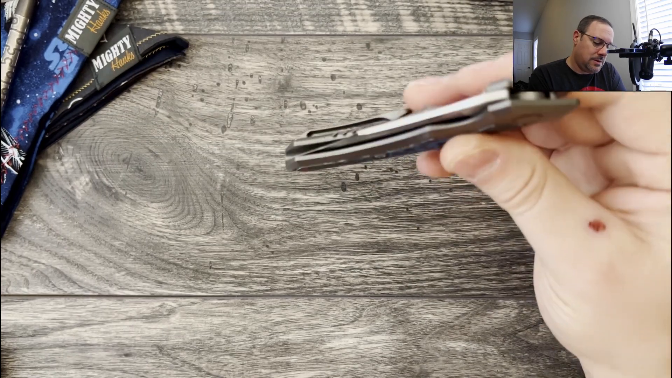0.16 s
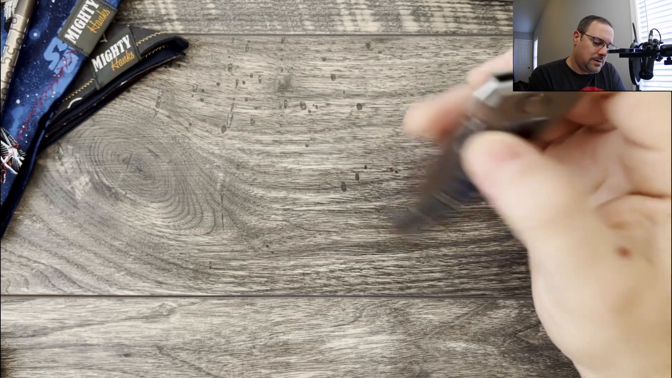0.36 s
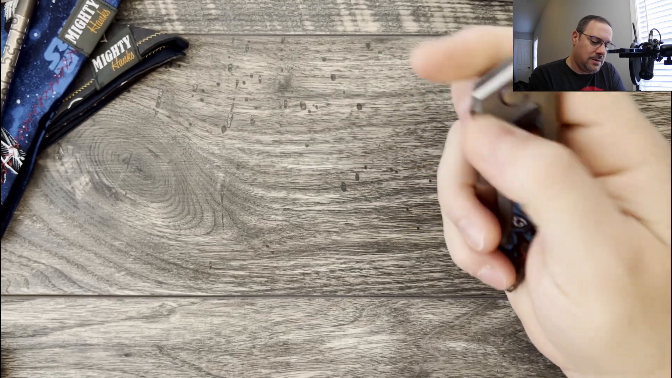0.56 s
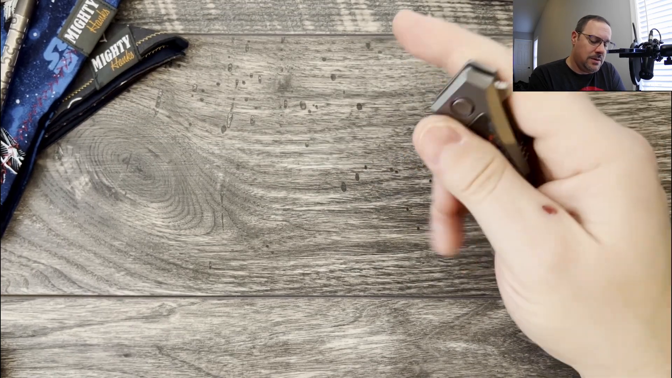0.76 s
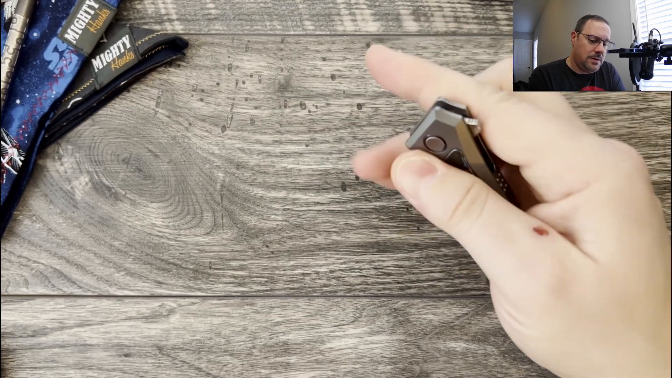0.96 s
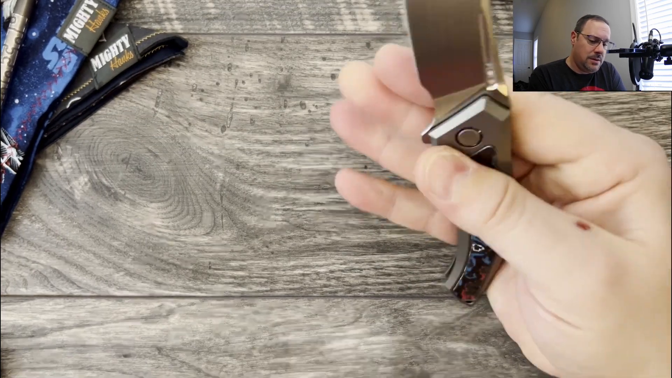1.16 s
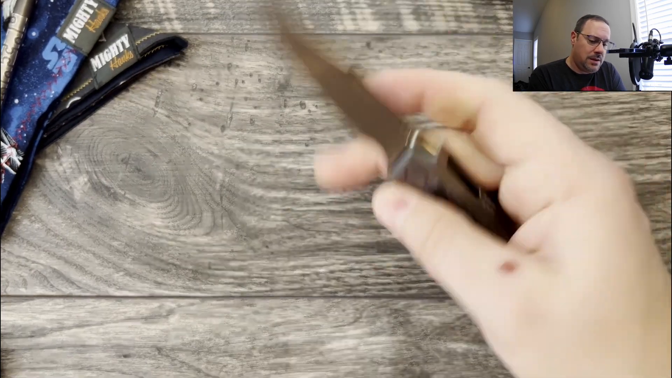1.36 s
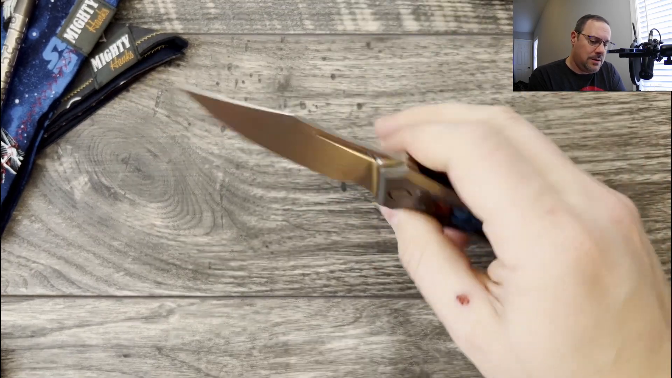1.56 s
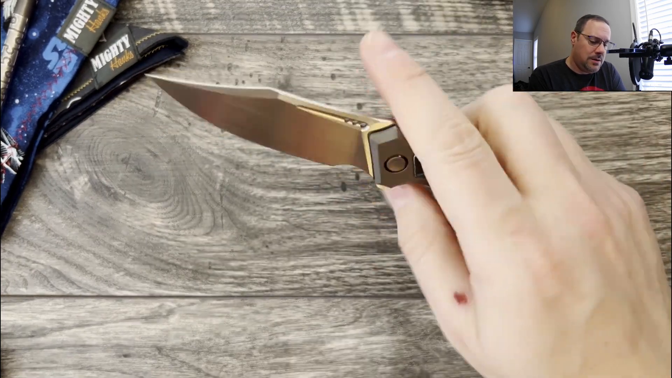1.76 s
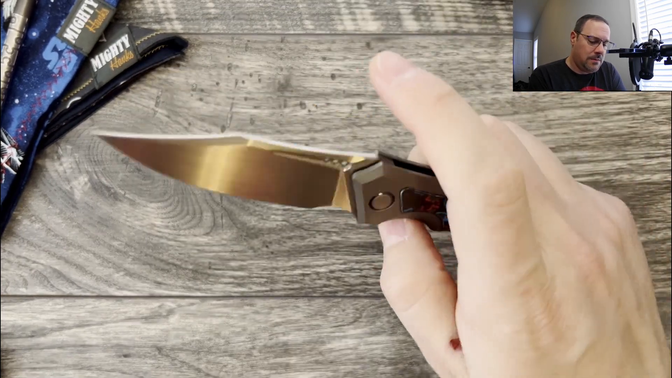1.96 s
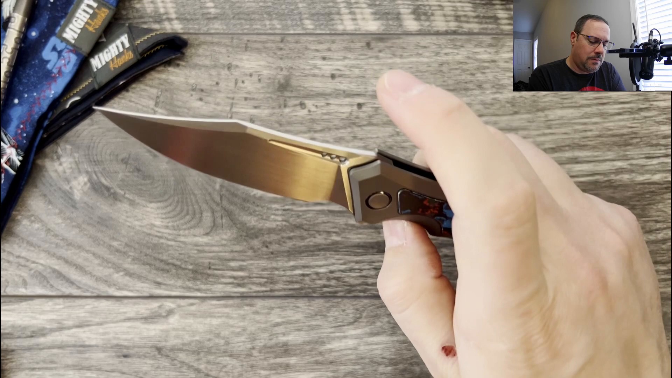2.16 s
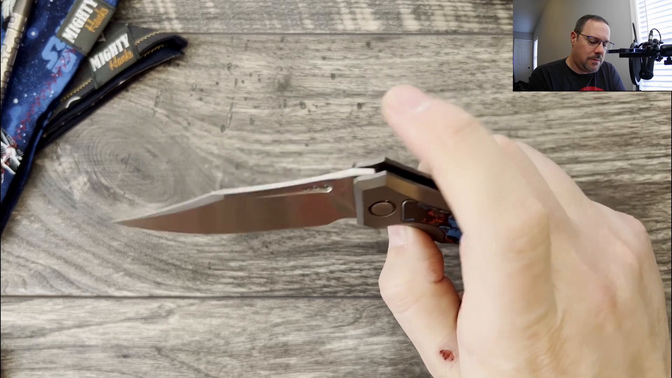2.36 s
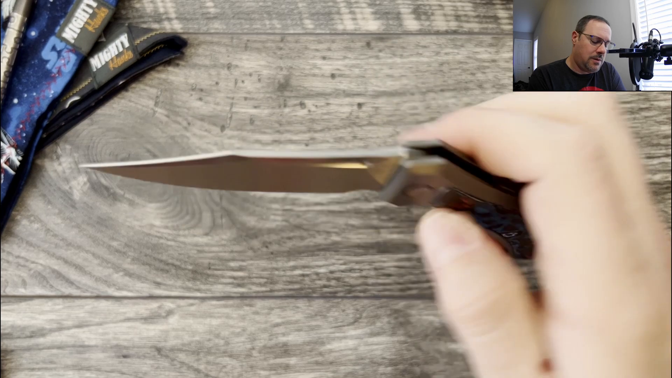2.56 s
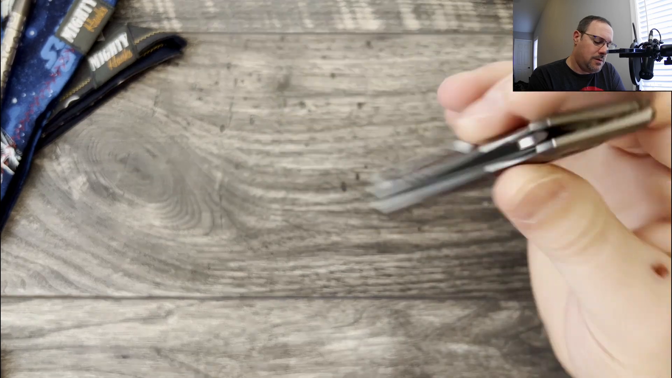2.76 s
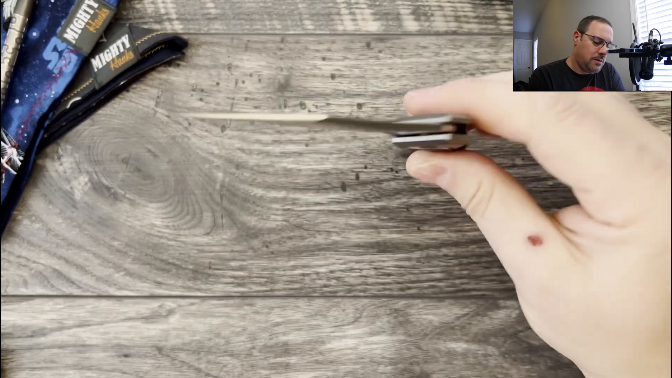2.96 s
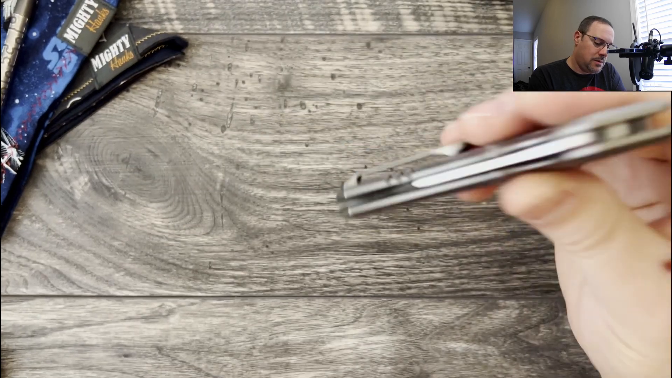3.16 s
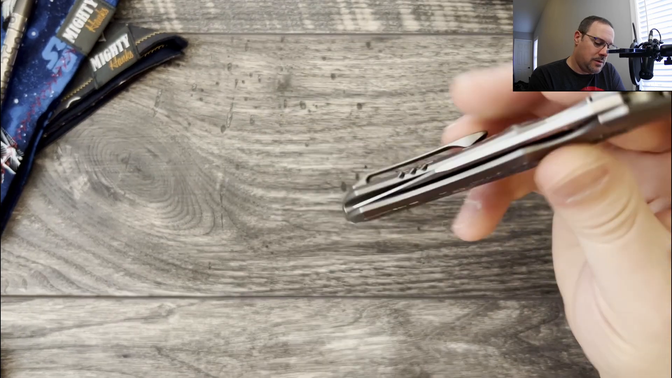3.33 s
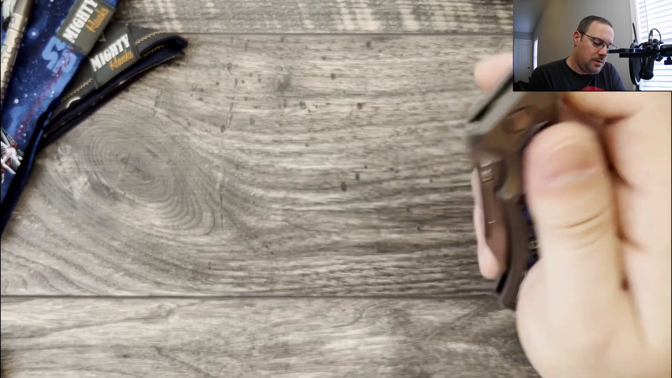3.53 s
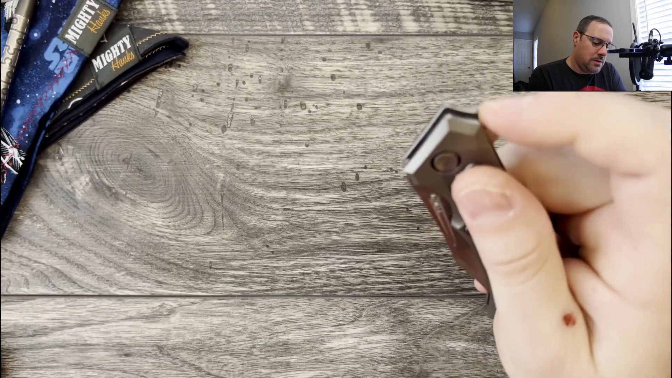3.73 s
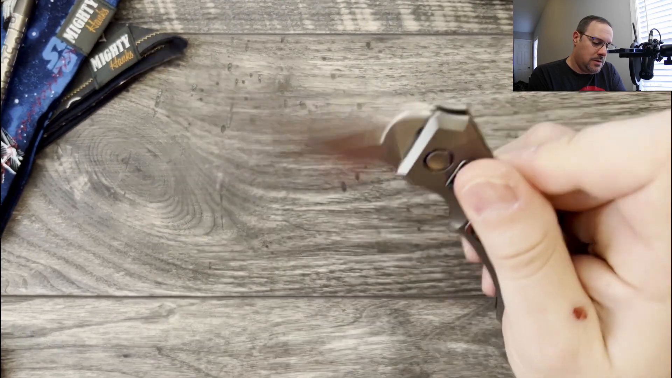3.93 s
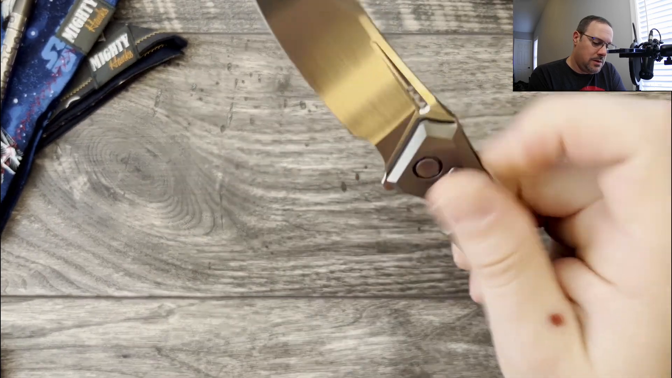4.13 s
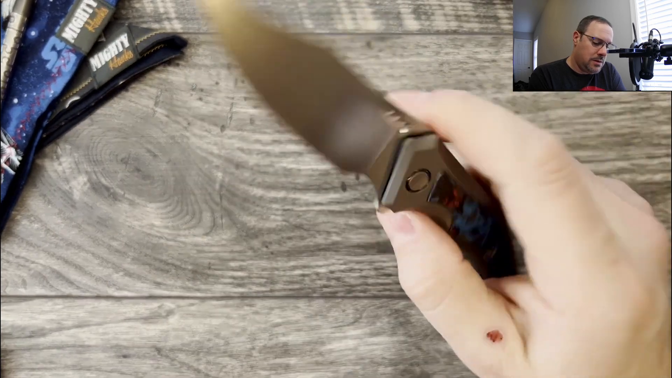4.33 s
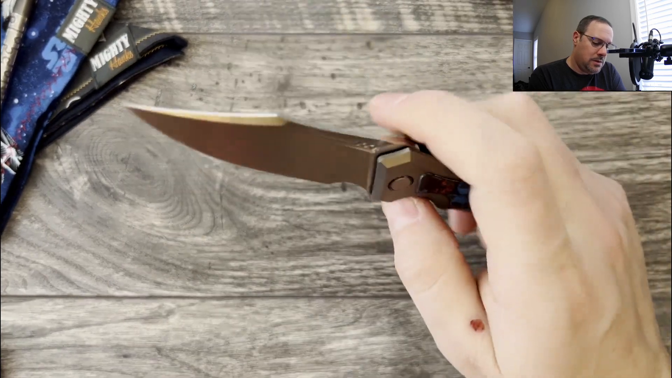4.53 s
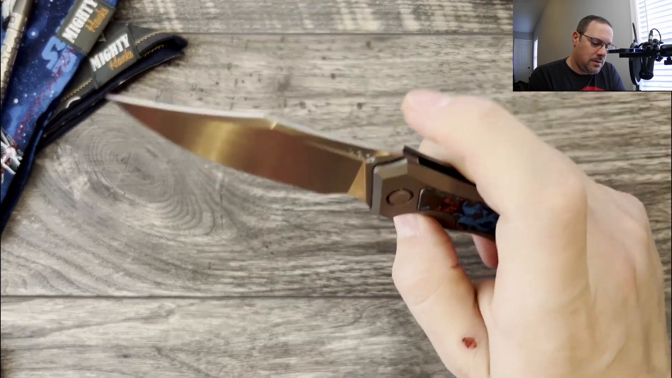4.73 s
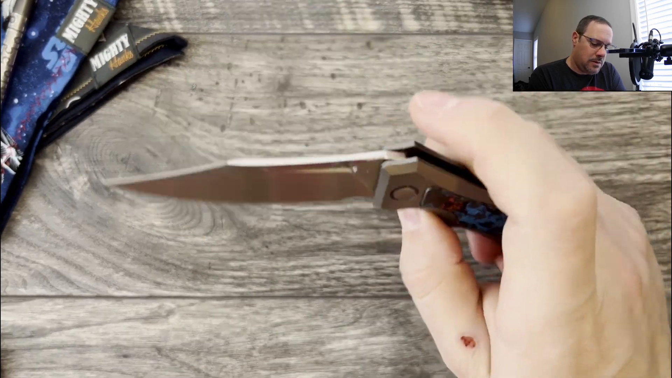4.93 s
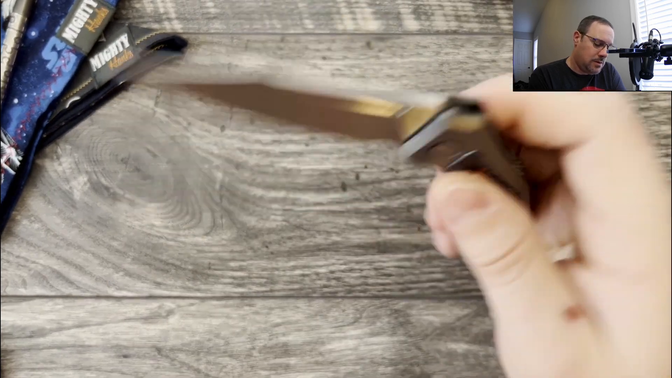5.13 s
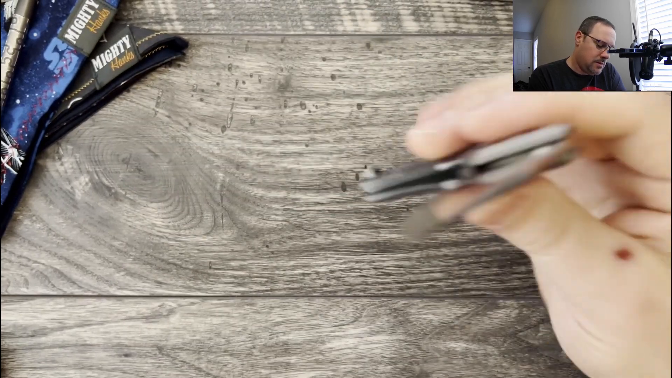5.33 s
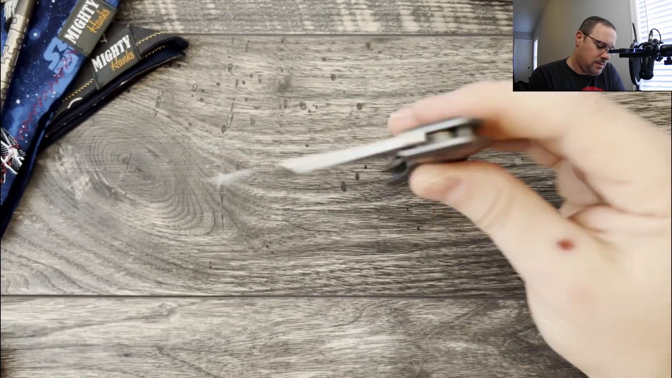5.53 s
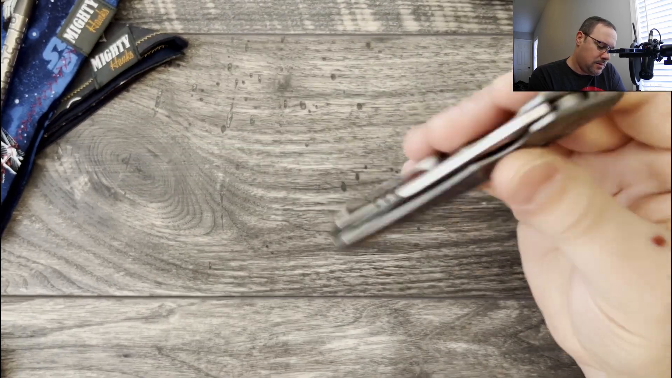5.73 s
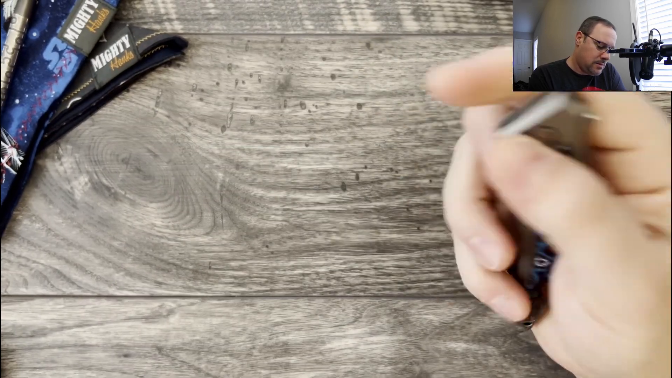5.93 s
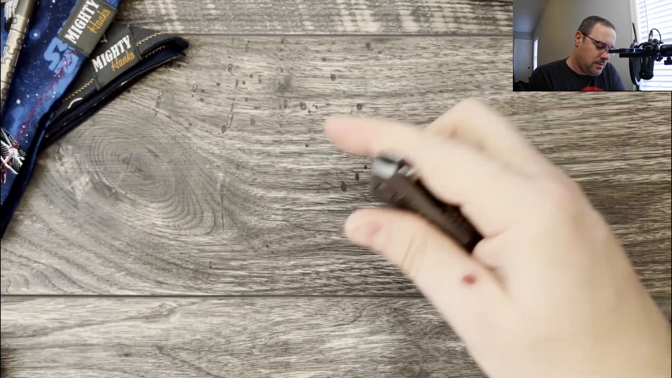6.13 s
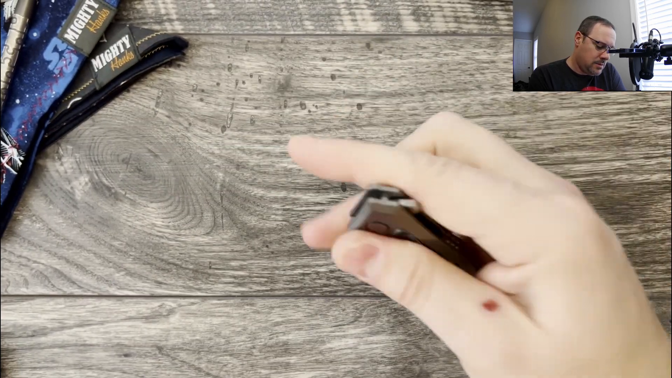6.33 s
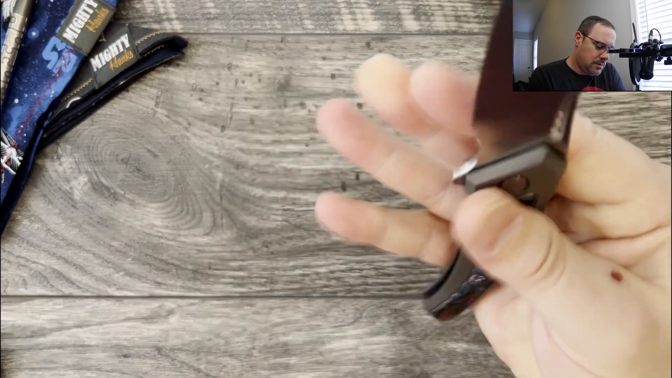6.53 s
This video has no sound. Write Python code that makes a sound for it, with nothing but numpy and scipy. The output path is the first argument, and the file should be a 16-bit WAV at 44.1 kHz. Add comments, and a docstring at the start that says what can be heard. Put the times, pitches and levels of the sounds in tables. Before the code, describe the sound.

Close, crisp knife action: blade drops shut with a rattly clack, then flicks open with a hard metallic snap, repeated in a small humming room.

```python
"""Small live room, stereo microphone close over a table: a metal folding knife is shut and flicked open three times.
A motor's low hum, a thin whine and the coloured noise of a fan run throughout, as steady tones and filtered noise.
First the blade drops shut with a clack and a rebound: short noise chatter rung through the handle's resonances.
Fingers then rub the handle as grainy hiss; a pivot swish leads to the lock bar's bright snap and the blade's hard clack.
The open blade rings on over a soft jolt of the hand; lock ticks fall in between, and the room answers the contacts."""
import sys
import numpy as np
from scipy import signal
from scipy.fft import rfft, irfft, next_fast_len
from scipy.io import wavfile
from scipy.ndimage import uniform_filter1d

SR = 44100
rng = np.random.default_rng(int(sys.argv[2]) if len(sys.argv) > 2 else 0)


def file_out(sig):
    """Save sig as 16-bit WAV at sys.argv[1]."""
    # one column per channel
    cols = np.atleast_2d(sig).T
    # limit, then scale
    lim = np.clip(cols, -1, 1)
    pcm = np.round(lim * 32767).astype(np.int16)
    wavfile.write(sys.argv[1], SR, pcm)


N = 295071
TIME = np.arange(N) / SR


def from_db(db):
    """Decibels to gain."""
    return 10 ** (np.asarray(db) / 20)


def at_hz(points, hz, axis=1):
    """Read one column of a table on a log-frequency axis."""
    table = np.array(points)
    return np.interp(np.log(hz + 1), np.log(table[:, 0]), table[:, axis])


def bins(size):
    """Frequencies of a real spectrum."""
    return np.arange(size // 2 + 1) * SR / size


def rms_one(x):
    """Scale to unit power."""
    return x / np.sqrt(np.mean(x ** 2) + 1e-20)


def add(out, s, sound):
    """Mix a sound in at time s."""
    start = max(0, round(s * SR))
    out[:, start:start + sound.shape[-1]] += sound[..., :N - start]


def colour(x, gain):
    """Causal (minimum-phase) filter with the given gain per bin."""
    size = x.shape[-1]
    cepstrum = irfft(np.log(gain + 1e-9), size)
    # fold the cepstrum onto positive time
    cepstrum[1:size // 2] *= 2
    cepstrum[size // 2 + 1:] = 0
    return irfft(rfft(x) * np.exp(rfft(cepstrum)), size)


def spread(pair, width):
    """Two unrelated signals become mid and side of a stereo pair."""
    mid = pair[0]
    side = colour(pair[1], from_db(at_hz(width, bins(pair.shape[-1]))))
    return np.array([mid + side, mid - side])


def resonant(modes, floor_gain, hz):
    """Gain per frequency of some resonances standing on a broad floor."""
    peaks = sum(from_db(db) ** 2 / (1 + 2 * ((hz - centre) / width) ** 2) ** 2
                for centre, width, db in modes)
    return np.sqrt(floor_gain ** 2 + peaks)


def noise(spectrum, width, modes=()):
    """Steady stereo noise of a given colour, rms 1."""
    size = 2 * next_fast_len(N // 2 + 1)
    hz = bins(size)
    white = spread(rng.standard_normal((2, size)), width)
    gain = resonant(modes, from_db(at_hz(spectrum, hz)), hz)
    return rms_one(colour(white, gain)[:, :N])


def drift(per_s):
    """A slow random wander with rms 1, aiming at per_s new values a second."""
    knots = rng.standard_normal(1000)
    return rms_one(np.interp(TIME * per_s, np.arange(len(knots)), knots))


# Thin electrical whine. Each row: pitch in Hz, level in dB.
WHINE = [(3130, -84), (6260, -102)]
HUM_HZ, HUM_LEVEL_DB = 59.3, -52.5
HUM_WAVER_DB, HUM_WAVER_PER_S = 1.5, 12   # size and pace of the hum's random swell


def hum(waver_rad):
    """A motor's low hum, unsteady in strength and phase, and a thin whine."""
    phase = 2 * np.pi * HUM_HZ * TIME + waver_rad * drift(HUM_WAVER_PER_S / 2)
    low = from_db(HUM_LEVEL_DB + HUM_WAVER_DB * drift(HUM_WAVER_PER_S)) * np.sin(phase)
    whine = sum(from_db(db) * np.sin(2 * np.pi * hz * TIME) for hz, db in WHINE)
    return np.sqrt(2) * (low + whine)   # levels are rms


# Colour of the fan noise. Each row: frequency in Hz, relative density in dB per Hz.
FAN = [(20, -20), (45, 1.5), (80, 6), (120, -1.5), (200, -5), (450, -8), (900, -8), (1300, -15),
       (2300, -15.5), (3250, -20.5), (5000, -37), (7450, -37), (8500, -44.5), (15500, -53.5), (16200, -70)]
# Fan's side against mid at the microphone. Each row: frequency in Hz, side level in dB.
FAN_WIDTH = [(60, -24.5), (130, -17), (290, -8.5), (640, -2), (1400, -4.5), (3000, -11), (7000, -2.5),
             (15000, -0.5)]
# Resonances in the fan noise. Each row: centre in Hz, width in Hz, level in dB.
FAN_MODES = [(257, 18, -6.5), (389, 12, -0.5), (545, 26, -3), (600, 15, -4.5), (645, 16, -5), (833, 16, -2),
             (868.7, 14, -4)]
FAN_DB = -58


def fan():
    """Steady broadband air noise with a few narrow resonances, filling the room."""
    return from_db(FAN_DB) * noise(FAN, FAN_WIDTH, FAN_MODES)


# Side against mid for the knife at the microphone. Each row: frequency in Hz, side level in dB.
WIDTH = [(100, -20), (400, -4.5), (700, -2.5), (1300, -17.5), (2400, -19), (4400, -9.5), (7000, -3),
         (15000, 2)]
# Colour of the rubbing hiss. Each row: frequency in Hz, level in dB.
SKIN = [(300, -21), (2000, -5), (4500, -2.5), (7000, 0), (9000, -4), (11000, -3.5), (13000, -10),
        (15300, -6), (16200, -25.5)]


def friction(modes, grain_db, grain_size):
    """Hiss that catches and slips every few milliseconds (grain_size in samples), rms 1."""
    grain = rms_one(uniform_filter1d(rng.standard_normal(N), size=grain_size))
    return rms_one(noise(SKIN, WIDTH, modes) * from_db(grain_db * grain))


# The blade swinging on its pivot. Each row: time of full speed in seconds, level in dB, run-up in seconds.
SWINGS = [(.02, -62.5, .1), (1.108, -46, .08), (3.924, -46, .037), (6.505, -46.5, 0.08),
          (3.098, -65.5, .125), (5.59, -63, 0.15)]
# Resonances of the turning pivot. Each row: centre in Hz, width in Hz, level in dB.
PIVOT = [(3950, 400, -2.5), (6300, 500, 0.5), (7800, 400, 2), (10900, 600, 5), (15100, 700, 0)]
SWING_RANGE_DB, SWING_STOP_S = 29.5, 0.09   # rise over the run-up; time to fall back as far


def pivot():
    """The pivot swishes louder as the blade gathers speed, and fades as it stops."""
    level = 0
    for s, db, run_up in SWINGS:
        distance = np.maximum((s - TIME) / run_up, (TIME - s) / SWING_STOP_S)
        level = level + from_db(db - SWING_RANGE_DB * distance)
    return level * friction(PIVOT, grain_db=2.6, grain_size=160)


def chatter(t60, rise_s, size, treble_hz=11000, treble_life=0.79):
    """Metal on metal: two unrelated dying bursts of micro-contacts, even in colour; their top dies first."""
    t, hz = np.arange(size) / SR, bins(size)
    white = rng.standard_normal((2, size))
    treble = irfft(rfft(white) / (1 + (treble_hz / (hz + 1)) ** 6), size)
    body = (white - treble) * from_db(-60 * t / t60)
    top = treble * from_db(-60 * t / (t60 * treble_life))
    burst = (body + top) * (1 - np.exp(-t / rise_s))
    # even out the colour
    power = uniform_filter1d(np.abs(rfft(burst)) ** 2, size=55, axis=-1)
    return np.array([colour(b, (p + 1e-12) ** -.5) for b, p in zip(burst, power)])


def strikes(events, modes, crack, rise_s, crack_db, room_crack_db, favour_db=3.0, size=4096):
    """Each contact chatters into the resonances of the struck part; its level is the rms of a 4 ms click
    of equal energy. Returns the sound aimed at the microphone and the broader one thrown into the room."""
    direct, thrown, hz = np.zeros((2, N)), np.zeros((2, N)), bins(size)
    octaves = np.log2(np.clip(hz, 1500, None) / 6000)
    for s, db, t60, tilt_db, favoured_hz, room_db in events:
        # grip and contact point tilt the colour and leave one resonance freer than the rest
        favour = favour_db / (1 + ((hz - favoured_hz) / 300) ** 2)
        grip = from_db(tilt_db * octaves + favour)
        burst = spread(chatter(t60, rise_s, size), WIDTH)
        for out, gain_db, floor_db in ((direct, 0, crack_db), (thrown, room_db, room_crack_db)):
            floor = from_db(at_hz(crack, hz) + floor_db)
            click = rms_one(colour(burst, resonant(modes, floor, hz) * grip))
            add(out, s, from_db(db + gain_db) * click * np.sqrt(.004 * SR / size))
    return np.array([direct, thrown])


# Blade dropping into the handle, then its rebound. Each row: start in seconds, level in dB, t60 in seconds,
# treble tilt in dB per octave, favoured frequency in Hz, send to the room in dB.
CLOSINGS = [(.0326, -15.8, .024, -.3, 5150, -.7), (.0465, -23, .048, -1, 7000, -1.5),
            (3.1166, -16, .032, -.3, 7200, -.3), (3.1322, -22.5, 0.045, -2, 7500, -1),
            (5.6034, -16.5, 0.028, 0.04, 10900, -1.5), (5.6150, -24, 0.044, -0.5, 4080, -1)]
# Resonances of the handle. Each row: centre in Hz, width in Hz, level in dB.
HANDLE = [(600, 260, -4.5), (980, 280, -2), (1520, 200, -10), (1984, 150, -5), (2870, 260, 2.5),
          (3935, 220, 7), (4440, 300, 4), (5150, 380, 4.5), (6250, 270, 6), (7060, 120, 14),
          (7750, 380, 6.5), (8800, 200, 6), (9800, 300, 1.5), (10850, 200, 8), (13640, 260, 5),
          (14980, 290, 10.5)]
# Broad crack under the handle's resonances. Each row: frequency in Hz, level in dB before the crack offsets.
CLOSE_CRACK = [(80, -22.5), (300, -14.5), (1000, -17.5), (2300, -17.5), (3500, -5), (8000, -8.5),
               (10500, -8), (12200, -11.5), (16000, -10)]


def closings():
    """The blade drops into the handle and bounces once, chattering into the handle's resonances."""
    return strikes(CLOSINGS, HANDLE, CLOSE_CRACK, rise_s=.00045, crack_db=5.0, room_crack_db=11.0)


# The room's reverberation. Each row: frequency in Hz, level in dB, t60 in seconds.
ROOM = [(99.84, -14.5, .3), (600, -16, .35), (1600, -15, 0.68), (2600, -14.5, 0.6), (4000, -11.8, .56),
        (5500, -13, 0.57), (7500, -12.5, .52), (11020, -13.8, .41), (12200, -17.5, .34),
        (15600, -19.5, .34), (16100, -45, .3)]


def unit_decay(db, t60, t):
    """Exponential decay that gives white noise the energy db."""
    return from_db(db - 60 * t / t60) * np.sqrt(2 * np.log(1000) / (t60 * SR))


def room(x, early_db, early_t60, wall_s, before_wall_db, wall_db, side_db):
    """Scatter from the table comes first; the tail swells when the walls answer and dies sooner in the treble."""
    size = 2 ** 15
    t, hz = np.arange(size) / SR, bins(size)
    spectrum, tail = rfft(rng.standard_normal((2, size))), 0
    centres = np.log([row[0] for row in ROOM])
    for k, (centre, db, t60) in enumerate(ROOM):
        # overlapping bands that add up to the whole spectrum
        share = np.interp(np.log(hz + 1), centres, np.arange(len(ROOM)) == k)
        tail = tail + irfft(spectrum * share) * unit_decay(db, t60, t)
    swell = from_db(np.interp(t, [wall_s - .004, wall_s, 2 * wall_s], [before_wall_db, wall_db, 0]))
    early = rng.standard_normal((2, size)) * unit_decay(early_db, early_t60, t)
    early = signal.sosfilt(signal.butter(2, 9000, fs=SR, output="sos"), early)
    mid, side = (tail * swell + early) * (t > .008)   # nothing returns in the first 8 ms
    side = from_db(side_db) * side
    response = np.array([mid + side, mid - side])
    return signal.fftconvolve(x, response, axes=-1)[:, :N]


# Fingers shifting their grip on the handle. Each row: middle in seconds, level in dB, length in seconds.
RUBS = [(0.441, -63, .13), (0.593, -64, 0.043), (.76, -82, 0.16), (1.47, -71.5, 0.13), (1.608, -69, 0.065),
        (1.7, -73, 0.075), (2.69, -81, .17), (3.473, -74, .06), (3.544, -66.5, 0.074), (4.321, -66, 0.044),
        (5.1, -79, .08), (5.868, -62, 0.087), (6.072, -68, .03), (6.236, -69.5, .075)]
# Resonances of the textured handle under a finger. Each row: centre in Hz, width in Hz, level in dB.
SCALES = [(6900, 900, 4), (9500, 1400, 3.5)]
RUB_EDGE_DB = 12   # a rub is this much weaker at either end of its length


def fingers():
    """Each change of grip is a soft rub of skin that swells and fades."""
    level = sum(from_db(db - RUB_EDGE_DB * np.abs(2 * (TIME - s) / length) ** 1.1)
                for s, db, length in RUBS)
    return level * friction(SCALES, grain_db=2.4, grain_size=120)


# Lock bar snapping across the blade heel. Each row: start in seconds, level in dB, t60 in seconds,
# treble tilt in dB per octave, favoured frequency in Hz, send to the room in dB.
SNAPS = [(1.1364, -14, .012, 1, 11240, -.5), (3.9564, -11, .024, 0, 7400, -1),
         (6.5264, -27, .02, -5, 6200, -3), (6.5282, -15.5, .005, 1, 10700, 1)]
# Resonances of the lock bar. Each row: centre in Hz, width in Hz, level in dB.
LOCK_BAR = [(3150, 250, -2), (5150, 300, -2), (6030, 300, 2.5), (7500, 450, 6.5), (8705, 350, 0.5),
            (10360, 400, 7.5), (11106, 300, 10.5), (12525, 440, -1), (14900, 770, 4)]
# Broad crack under the lock bar's resonances. Each row: frequency in Hz, level in dB before the crack offsets.
SNAP_CRACK = [(100, -20.5), (500, -18.5), (1000, -14), (2200, -13.5), (4000, -5), (9000, -3),
              (13000, -11.5), (16000, -7)]


def snaps():
    """The lock bar snaps across the blade heel, an abrupt chatter into its bright resonances."""
    return strikes(SNAPS, LOCK_BAR, SNAP_CRACK, rise_s=.00015, crack_db=0.5, room_crack_db=7.0)


# Blade hitting its stop pin, once with a rebound. Each row: start in seconds, level in dB, t60 in seconds,
# treble tilt in dB per octave, favoured frequency in Hz, send to the room in dB.
STOPS = [(1.1402, -11.5, .016, 0.1, 5124, 3.5), (3.9603, -10.5, 0.019, -1, 7300, -1.5),
         (3.9735, -27, .06, -2, 5460, 0.5), (6.5330, -16.5, 0.05, -0.5, 5400, 6.5)]
# Resonances of the blade. Each row: centre in Hz, width in Hz, level in dB.
BLADE = [(1596, 150, 1.5), (2210, 400, 1.5), (3040, 280, 0), (3805, 170, 6.5), (4330, 330, -0.5),
         (5030, 120, 7.5), (5356, 170, 9.5), (6020, 280, 3.5), (6456, 300, 1.5), (7036, 150, 7.5),
         (7340, 160, 9), (7795, 250, 1.5), (8545, 250, 0.5), (9010, 270, -2.5), (11090, 410, -2.5),
         (13600, 260, -5.5), (15000, 500, -9)]
# Broad crack under the blade's resonances. Each row: frequency in Hz, level in dB before the crack offsets.
STOP_CRACK = [(100, -17), (500, -25), (1200, -21), (1600, -12), (2700, -16.5), (4000, -2), (8000, -6.5),
              (12000, -9.5), (16000, -19)]


def stops():
    """The blade hits its stop pin, a slower-rising chatter into the blade's many resonances."""
    return strikes(STOPS, BLADE, STOP_CRACK, rise_s=.0009, crack_db=0.5, room_crack_db=6.0)


# The opened blade left ringing. Each row: start in seconds, level of the ring in dB, level of the flex in dB.
RINGS = [(1.141, -11, -29), (3.961, -12.5, -37), (6.538, -9.5, -25.5)]
# Modes of the open blade. Each row: centre in Hz, level in dB relative to the ring, t60 in seconds.
RING = [(1580, -37, .42), (3850, -40.5, .4), (5080, -38, .55), (5380, -35, 0.55), (6040, -41.5, .55),
        (7300, -44, .35)]
RING_WIDTH_HZ = 110   # each ring is a cluster of close modes this wide
FLEX_HZ, FLEX_T60_S = 1620, .07   # the blade's lowest bending mode, soon damped by the hand


def blade_ring(size=2 ** 16):
    """Locked open, the blade flexes briefly and sings on faintly in clusters of close modes."""
    out, t, hz = np.zeros((2, N)), np.arange(size) / SR, bins(size)
    for s, db, flex_db in RINGS:
        add(out, s, from_db(flex_db - 60 * t / FLEX_T60_S) * np.sin(2 * np.pi * FLEX_HZ * t))
        for centre, mode_db, t60 in RING:
            band = resonant([(centre, RING_WIDTH_HZ, 0)], 0, hz)
            mid, side = rms_one(irfft(rfft(rng.standard_normal((2, size))) * band))
            side = side * from_db(at_hz(WIDTH, centre))
            decay = from_db(db + mode_db - 60 * t / t60)
            add(out, s, np.array([mid + side, mid - side]) * decay)
    return out


# Jolt of the hand as the blade stops. Each row: start in seconds, level in dB, pitch in Hz, t60 in seconds.
JOLTS = [(1.150, -36, 85, .1), (3.966, -44.5, 90, .08), (6.536, -32, 125, .061), (6.534, -35, 290, 0.046)]


def jolts():
    """The hand takes the blade's momentum with a soft, quickly damped thud."""
    out, t = np.zeros((2, N)), TIME[:SR // 4]
    for s, db, hz, t60 in JOLTS:
        thud = from_db(db - 60 * t / t60) * np.sin(2 * np.pi * hz * t)
        add(out, s, thud * (1 - np.exp(-t / 0.002)))
    return out


# Small ticks of the lock and detent ball. Each row: start in seconds, level in dB, t60 in seconds,
# treble tilt in dB per octave, favoured frequency in Hz, send to the room in dB.
TICKS = [(2.2795, -59, .03, -8, 5000, -4), (2.2920, -47, 0.024, -6, 3300, -1),
         (2.320, -67, .03, -4, 3300, -2), (2.575, -69, .04, -6, 8000, -3),
         (4.8205, -38, .034, -1.5, 3400, 2), (4.8590, -35.5, 0.027, 2, 3400, -3.5),
         (4.956, -64.5, .03, 1, 4500, -2), (5.128, -66, 0.031, -9, 4200, -2),
         (5.8605, -52, .02, -7, 2300, -2), (6.4875, -42, 0.031, -6, 2500, 0)]
# Resonances of lock and detent under a light tick. Each row: centre in Hz, width in Hz, level in dB.
DETENT = [(3400, 260, 10), (4200, 460, 2.5), (6050, 460, 5.5), (7200, 550, 6.5), (8840, 600, 5.5),
          (10730, 870, 6.5), (13600, 400, -4), (15000, 400, -5)]
# Broad crack under the detent's resonances. Each row: frequency in Hz, level in dB before the crack offsets.
TICK_CRACK = [(200, -23.5), (1500, -15), (2400, -6), (3200, -5.5), (7000, 0), (10500, 0), (12500, -9),
              (16000, -8)]


def ticks():
    """Light contacts of the lock and detent ball chatter into their own resonances."""
    return strikes(TICKS, DETENT, TICK_CRACK, rise_s=0.00031, crack_db=0.2, room_crack_db=4.0)


def scene():
    """The knife in the hand, its room, and the steady background."""
    contacts = closings() + snaps() + stops() + ticks()
    # the rubbing sounds go equally to the microphone and into the room
    direct, thrown = contacts + pivot() + fingers()
    echo = room(thrown, early_db=-9, early_t60=0.077, wall_s=0.036,
                before_wall_db=-7.5, wall_db=1.5, side_db=-4.5)
    return direct + echo + blade_ring() + jolts() + hum(waver_rad=.15) + fan()


def record(dry):
    """The top is cut steeply, 60 dB down from 17.1 kHz up."""
    return signal.sosfilt(signal.cheby2(16, 60, 17100, fs=SR, output="sos"), dry)


dry = scene()
out = record(dry)
file_out(out)
```